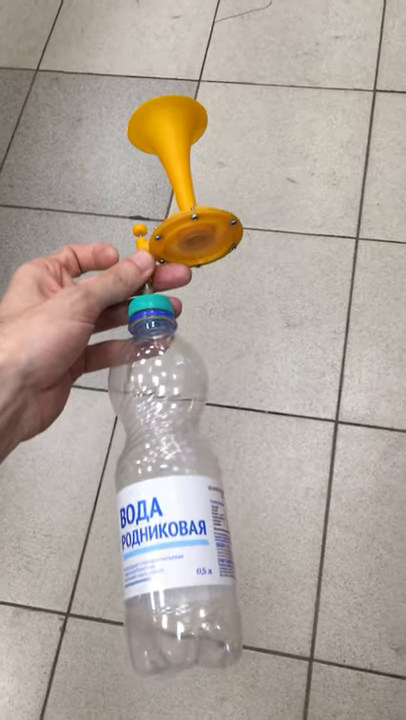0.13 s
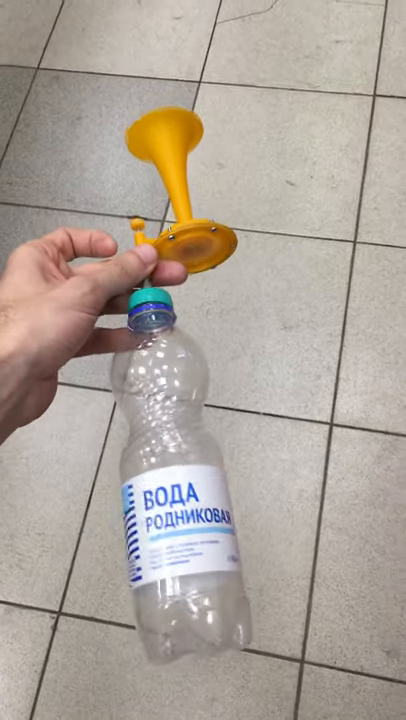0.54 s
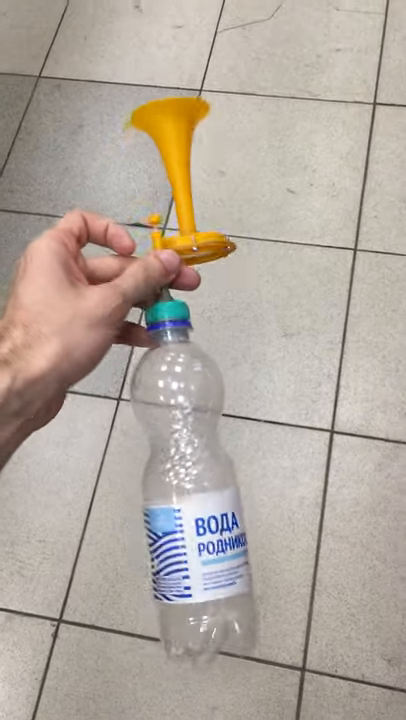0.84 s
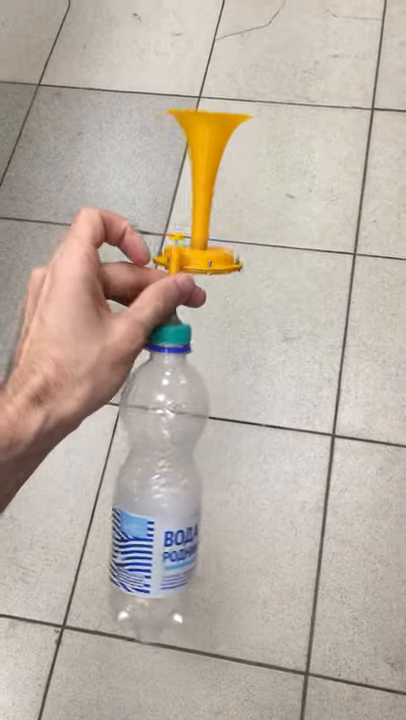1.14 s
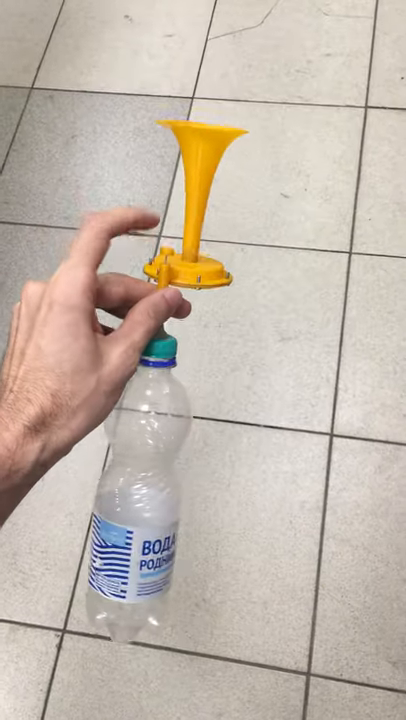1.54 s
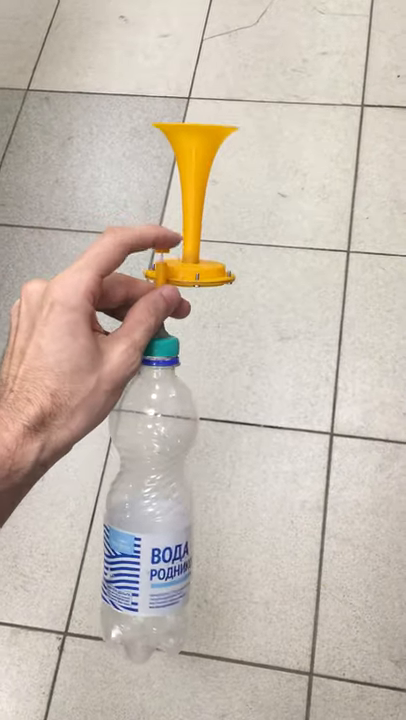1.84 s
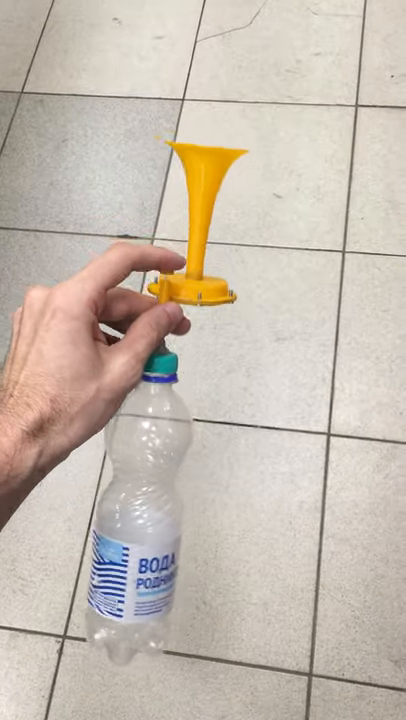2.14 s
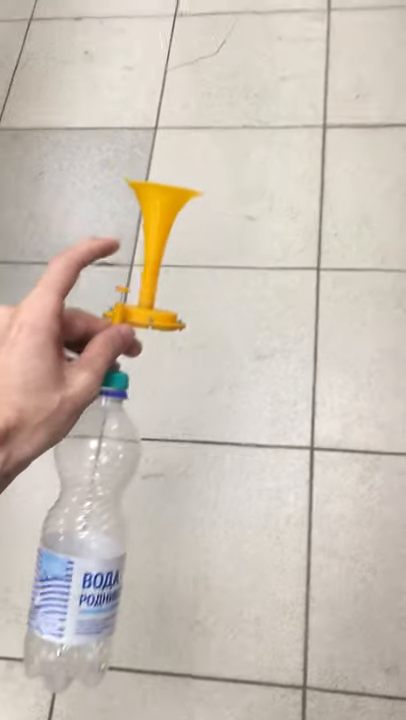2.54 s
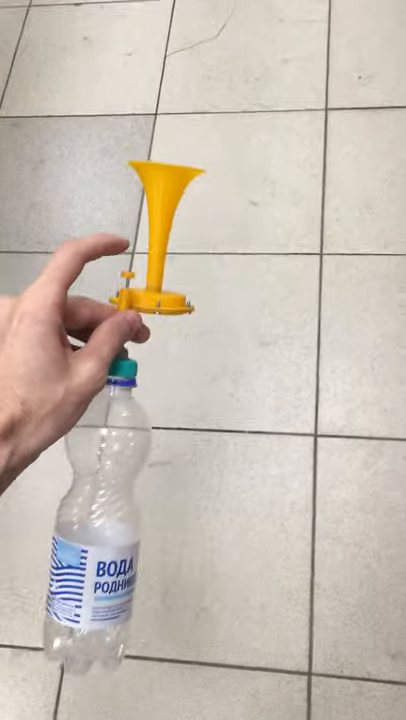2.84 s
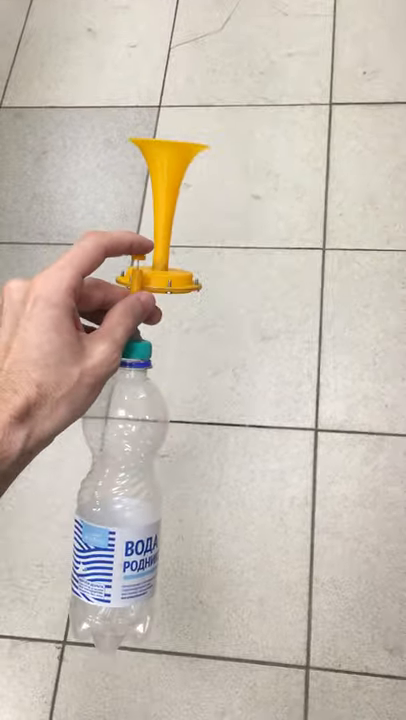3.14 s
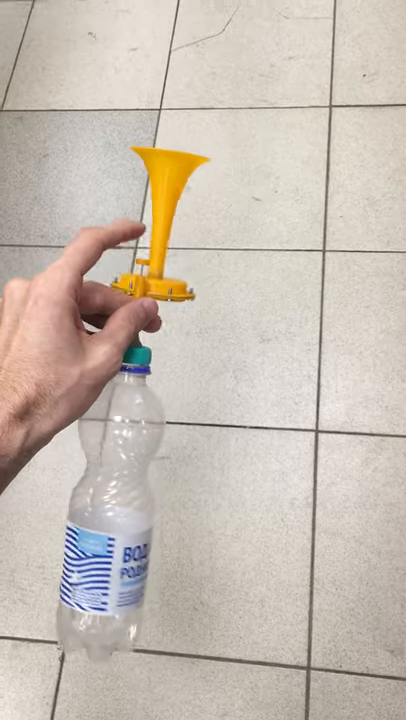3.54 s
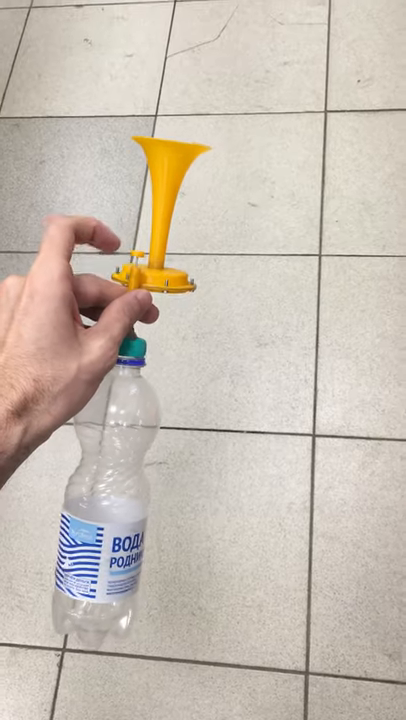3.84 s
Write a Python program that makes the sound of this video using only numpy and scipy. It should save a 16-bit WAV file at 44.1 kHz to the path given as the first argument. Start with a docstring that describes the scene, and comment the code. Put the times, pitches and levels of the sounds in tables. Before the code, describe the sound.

A small air horn gives two short, loud, raspy blasts close to the microphone, a little over a second apart. Each rings on in a tiled room, with a faint hum and tiny finger scuffs in between.

```python
"""A tiled room, humming and hissing faintly, with a hall beyond. A finger scuffs the valve button of a
small air horn on a pumped-up plastic bottle, then fires two short blasts. The air sets a diaphragm
beating: a bright, raspy tone that opens with a puff, then flicks up in pitch and dies in a spit of hiss.
Both spaces ring on. A phone's gain control ducks at each blast and creeps back up."""
import sys
import numpy as np
from scipy import signal
from scipy.fft import rfft, irfft
from scipy.io import wavfile
from scipy.ndimage import uniform_filter1d, minimum_filter1d

SR = 44100
rng = np.random.default_rng(int(sys.argv[2]) if len(sys.argv) > 2 else 0)


def persist_wave(psi):
    """Save psi, clipped to +-1, as 16-bit WAV."""
    counts = np.round(np.clip(psi, -1, 1) * 32767).astype(np.int16)
    wavfile.write(sys.argv[1], SR, np.atleast_2d(counts).T)


N = 176400

# Tone colour of the room air: frequency_hz, relative_db
AIR_SPECTRUM = [(20, -1), (45, 1), (100, 6.5), (170, 3), (335, -2), (503, -8.5), (775, -9), (1000, -9),
                (2280, -15.5), (3000, -20.5), (5000, -26), (8000, -35), (12000, -34.5), (16000, -37)]
# Machinery hums: pitch_hz, width_hz, level_db
MACHINE_HUMS = [(51.7, 12, -72), (340, 25, -100.5), (583.8, 20, -97.5), (920, 30, -95.5), (2330, 350, -100),
                (3300, 430, -104)]
# Swell of the low drone: time_s, level_db
DRONE_SWELL = [(0, -85.5), (1.1, -80.5), (1.5, -77), (2.1, -75.5), (3.201, -70), (4, -72)]
# Finger scuffs on the button: start_s, level_db (with the gain fully up), centre_hz, length_s
SCUFFS = [(0.493, -68, 7000, 0.0037), (1.155, -65, 9000, .005), (2.805, -45.5, 2200, 0.0039),
          (3.183, -54.5, 5976, .002), (3.193, -61, 5000, .003), (3.201, -54.5, 5480, 0.0045)]
# The horn's tone as heard in the room, one list per blast:
# time_s, pitch_hz, partial_1_db, partial_2_db, partial_3_db, partial_4_db, upper_db
BLAST_CURVES = [
    [(2.175, 1011, -13, -23, -17.5, -26, -33), (2.187, 988.2, -14.5, -16.5, -13, -24.5, -30),
     (2.211, 987, -10.5, -14.5, -13.5, -15.5, -24), (2.229, 979, -13, -15, -29, -16.5, -28),
     (2.237, 984.4, -9.5, -17.5, -27.5, -16.5, -30), (2.271, 985, -17.5, -16, -26.5, -20, -26.5),
     (2.297, 981.3, -15, -16.5, -31, -19.5, -25.5), (2.313, 985, -18.5, -19, -19, -21.5, -29.5),
     (2.331, 978.5, -18, -16.5, -16.5, -20.5, -32.5), (2.344, 975, -17, -21, -32, -24, -28.5)],
    [(3.426, 1010, -12, -14.5, -19, -21.5, -36), (3.444, 1002, -15, -18, -12.5, -20, -25),
     (3.462, 998.3, -13, -15, -16.5, -19.5, -29.5), (3.488, 989.4, -9, -14.5, -20.5, -19, -22.5),
     (3.502, 997.3, -15.5, -16, -32.5, -15.5, -25), (3.51, 989.5, -18, -17.5, -22, -20, -28),
     (3.544, 988.8, -16.5, -14.5, -18, -19.5, -31.5), (3.549, 982, -15.5, -21, -31.5, -22.5, -27)],
]
# The horn's upper partials: harmonic_number, offset_db (from upper_db)
UPPER_PARTIALS = [(5, -2), (6, -9.5), (7, -10), (8, -9.5), (9, -11.5), (10, -17.5), (11, -15.5), (12, -15),
                  (13, -12), (14, -19.5), (15, -14.5), (16, -29)]
# Puff as the valve opens: frequency_hz, relative_db
PUFF_SPECTRUM = [(25, -50), (100, -29), (400, -14.5), (1000, -0.5), (3000, 6), (6000, -6.5), (10000, -15.5),
                 (16000, -27)]
# Spit as the valve shuts: frequency_hz, relative_db
SPIT_SPECTRUM = [(300, -51), (1500, -25), (3500, -6), (5500, 8.5), (8000, -1), (12000, -10.5), (16000, -20)]
# Tone colour of the room's and hall's ring: frequency_hz, relative_db
REVERB_COLOUR = [(500, -2), (1000, 1.5), (2000, -3.5), (3000, 3.5), (4000, -4.5), (7000, -1), (14000, -3.5)]
# Ring of the tiled room: frequency_hz, t60_s
ROOM_DECAY = [(500, 0.4), (1000, 0.3), (2000, 0.39), (3000, 0.46), (6000, 0.46), (9000, .45), (14000, 0.26)]
# Ring of the hall beyond: frequency_hz, t60_s
HALL_DECAY = [(500, 1.5), (1000, 1.26), (3000, 1.25), (6000, 0.87), (12000, 0.62)]

VALVE_OPENS_S = (2.1702, 3.4205)
ATTACK_S, BRIGHTEN_S = .0014, .003
RELEASE_S, RELEASE_DB = .028, -46.5
LOW_FADE_DB, UPPER_FADE_DB = (5.5, -57, .5, -84), -320  # added over the release: partials 1-4, the rest
FLICK_DEPTH, FLICK_S, FLUTTER_DEPTH = .15, .017, .03  # pitch bend as the valve shuts
WANDER_DB, WANDER_S = 3.0, .035
RASP_DEPTH, RASP_S = .13, .019
PUFF_DB, PUFF_S, SPIT_DB, SPIT_S = -23, .012, -38.5, .0076
HORN_LOW_CUT_HZ = 500  # keeps the blast's onset free of low thump
BOOST_DB, TARGET_DB, RECOVER_DB_PER_S = 24, -14.5, 32
BASS_HZ, BASS_SHARE, BASS_LAG_S = 180, .7, .055  # the bass follows the gain control less, and late
CEILING, HIGH_CUT_HZ = .72, 15900


def amp(db):
    return 10 ** (np.asarray(db) / 20)


def unit_rms(x):
    return x / np.sqrt(np.mean(x ** 2) + 1e-20)


def curve_at(points, hz):
    f, value = np.transpose(points)
    return np.interp(np.log(hz + 1), np.log(f + 1), value)


def add(mix, start_s, sound):
    part = mix[round(start_s * SR):][:len(sound)]
    part += sound[:len(part)]


def coloured_noise(spectrum, size):
    gain = amp(curve_at(spectrum, np.fft.rfftfreq(size, 1 / SR)))
    return unit_rms(irfft(rfft(rng.standard_normal(size)) * gain, size))


def narrow_noise(hz, width_hz):
    detune = 2 * (np.fft.rfftfreq(N, 1 / SR) - hz) / width_hz
    return unit_rms(irfft(rfft(rng.standard_normal(N)) / (1 + detune ** 2), N))


def wobble(size, span, passes=1):
    """Random modulation, smoothed over span samples."""
    noise = rng.standard_normal(SR // 2)
    for _ in range(passes):
        noise = uniform_filter1d(noise, span)
    return unit_rms(noise)[:size]


def room_tone():
    """The bed: air hiss, machinery hums and a low drone that wavers and swells."""
    t = np.arange(N) / SR
    hums = sum(amp(db) * narrow_noise(hz, width) for hz, width, db in MACHINE_HUMS)
    air = amp(-82) * coloured_noise(AIR_SPECTRUM, N)
    drone_hz = 78.3
    drone = np.sqrt(2) * np.sin(2 * np.pi * drone_hz * t) + .19 * narrow_noise(drone_hz, width_hz=14)
    swell = amp(np.interp(t, *np.transpose(DRONE_SWELL)))
    return air + hums + swell * drone


def finger_scuffs():
    """Skin rubs the plastic button: tiny, dry grains of noise."""
    out, t = np.zeros(N), np.arange(1500) / SR
    spread = 2 ** .9  # 0.9 octave either side
    for start_s, db, hz, length_s in SCUFFS:
        band = signal.butter(2, [hz / spread, min(hz * spread, 20000)], "band", fs=SR)
        grain = unit_rms(signal.lfilter(*band, rng.standard_normal(len(t))))
        envelope = t / length_s * np.exp(1 - 2 * t / length_s)
        add(out, start_s, amp(db - BOOST_DB) * grain * envelope)
    return out


def horn_tone(t, since_open, since_shut, curves):
    """The horn as heard in the room, its harmonics fading and swelling as reflections interfere."""
    times, pitch_hz, *low_db, upper_db = np.transpose(curves)
    flutter = FLUTTER_DEPTH * wobble(len(t), span=60)
    bend = 1 + (FLICK_DEPTH + flutter) * np.minimum(since_shut / FLICK_S, 1)
    phase = 2 * np.pi * np.cumsum(np.interp(t, times, pitch_hz) * bend) / SR
    brighten = 1 - np.exp(-(since_open / BRIGHTEN_S) ** 2)
    release = (since_shut / RELEASE_S) ** 2
    tone = 0
    for k, db in enumerate(low_db, 1):
        onset = 1 if k % 2 else brighten  # partials 1 and 3 speak first
        level_db = np.interp(t, times, db) + LOW_FADE_DB[k - 1] * release
        tone += onset * amp(level_db) * np.sin(k * phase + k * k)
    for k, offset_db in UPPER_PARTIALS:
        wander_db = WANDER_DB * wobble(len(t), round(WANDER_S * SR), passes=2)
        level_db = np.interp(t, times, upper_db) + offset_db + wander_db + UPPER_FADE_DB * release
        tone += brighten * amp(level_db) * np.sin(k * phase + 2 * np.pi * rng.random())
    return tone


def horn_blast(open_s, curves):
    """Air puffs through the valve and the diaphragm rasps into tone; the closing spit comes separately."""
    shut_s = curves[-1][0]
    t = np.arange(open_s, shut_s + RELEASE_S, 1 / SR)
    since_open, since_shut = t - open_s, np.maximum(t - shut_s, 0)
    tone = np.sqrt(2) * horn_tone(t, since_open, since_shut, curves)
    attack = 1 - np.exp(-(since_open / ATTACK_S) ** 2)
    envelope = attack * amp(RELEASE_DB * (since_shut / RELEASE_S) ** 2)
    rasp = 1 + RASP_DEPTH * np.exp(-since_open / RASP_S) * wobble(len(t), span=70)
    blare = signal.lfilter(*signal.butter(2, HORN_LOW_CUT_HZ, "high", fs=SR), envelope * rasp * tone)
    puff = amp(PUFF_DB) * coloured_noise(PUFF_SPECTRUM, SR // 2)[:len(t)]
    puff *= envelope * np.exp(-since_open / PUFF_S)
    spit = amp(SPIT_DB) * coloured_noise(SPIT_SPECTRUM, SR // 2)[:len(t)]
    spit *= np.exp(-((t - shut_s - SPIT_S) / SPIT_S) ** 2)
    return blare + puff, spit


def reverb(send, decay, level_db, first_echo_s=.006):
    """Scattered echoes off the walls blur into a tail, each band dying at its own speed."""
    echoes, spacing = np.zeros(2 * SR), 20
    slots = np.arange(round(first_echo_s * SR), 2 * SR - spacing, spacing)
    jitter = rng.integers(0, spacing, 2 * SR)[:len(slots)]
    echoes[slots + jitter] = rng.choice([-1., 1.], 2 * SR)[:len(slots)]
    hz, t, bands = signal.stft(echoes, SR, nperseg=256)
    tail_db = curve_at(REVERB_COLOUR, hz)[:, None] - 60 * t / curve_at(decay, hz)[:, None]
    tail = signal.istft(bands * amp(tail_db), SR, nperseg=256)[1]
    return amp(level_db) * signal.fftconvolve(send, tail / np.linalg.norm(tail))[:N]


def gain_control(dry):
    """Lifts quiet sound, ducks at once under a blast and recovers slowly."""
    power_db = 10 * np.log10(abs(uniform_filter1d(dry[0] ** 2, 88)) + 1e-12)
    recovery_db = np.arange(N) * RECOVER_DB_PER_S / SR
    held_db = np.maximum.accumulate(power_db + recovery_db) - recovery_db
    lift_db = uniform_filter1d(np.clip(TARGET_DB - held_db, 0, BOOST_DB), 44)
    pole = np.exp(-1 / (BASS_LAG_S * SR))
    lagged_db = signal.lfilter([1 - pole], [1, -pole], lift_db, zi=[pole * lift_db[0]])[0]
    bass = signal.sosfiltfilt(signal.butter(2, BASS_HZ, fs=SR, output="sos"), dry)
    return (dry - bass) * amp(lift_db) + bass * amp(BASS_SHARE * lagged_db)


def limiter(x):
    """Rides the loudest peaks down to the ceiling."""
    peak = -minimum_filter1d(-abs(x), 132)
    return x * uniform_filter1d(np.minimum(CEILING / (peak + 1e-9), 1), 88)


def scene():
    """Scuffs and two blasts up close, ringing in room and hall over the room tone, in mono."""
    direct, spit_send = finger_scuffs(), np.zeros(N)
    for open_s, curves in zip(VALVE_OPENS_S, BLAST_CURVES):
        horn, spit = horn_blast(open_s, curves)
        add(direct, open_s, horn + spit)
        add(spit_send, open_s, amp(.5) * spit)  # the spit reaches the walls better than the microphone
    send = direct + spit_send
    room = reverb(send, ROOM_DECAY, level_db=-13)
    hall = reverb(send, HALL_DECAY, level_db=-39.5)
    return (direct + room + hall + room_tone())[None]


def record(dry):
    """The phone's chain: gain control, limiter, then a steep high cut."""
    high_cut = signal.firwin(511, HIGH_CUT_HZ, window=("kaiser", 12), fs=SR)
    return signal.oaconvolve(limiter(gain_control(dry)), high_cut[None], "same")


dry = scene()
out = record(dry)
persist_wave(out)
```